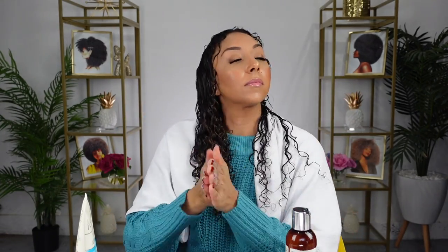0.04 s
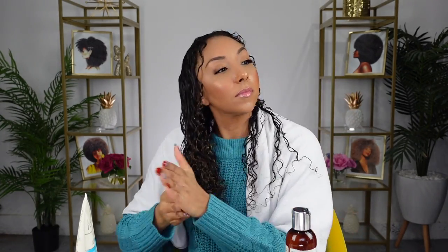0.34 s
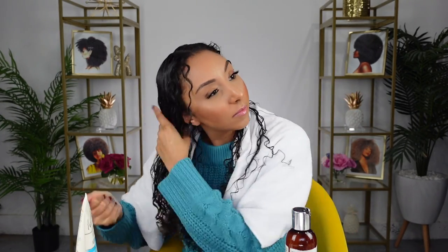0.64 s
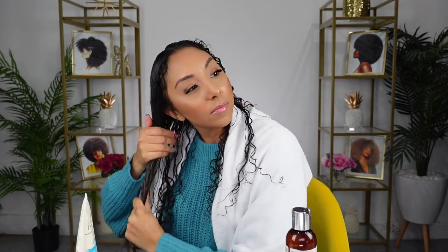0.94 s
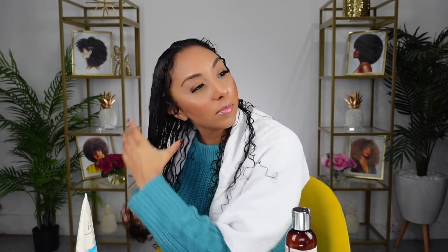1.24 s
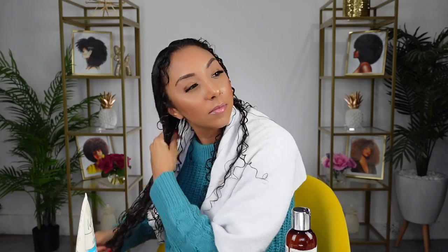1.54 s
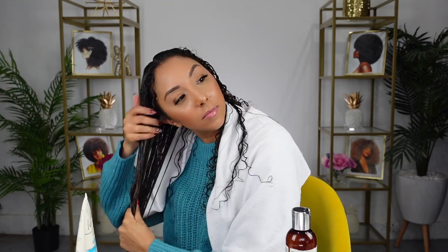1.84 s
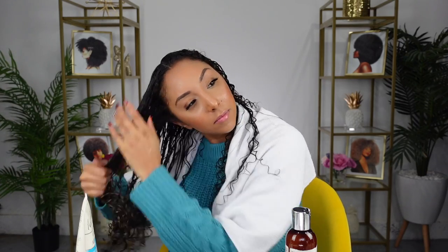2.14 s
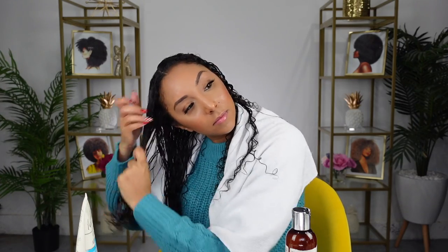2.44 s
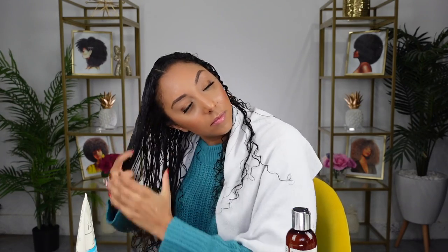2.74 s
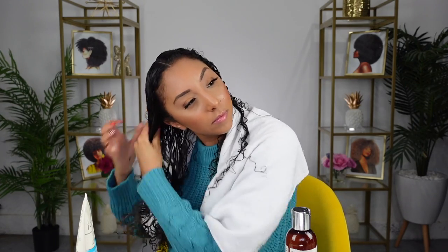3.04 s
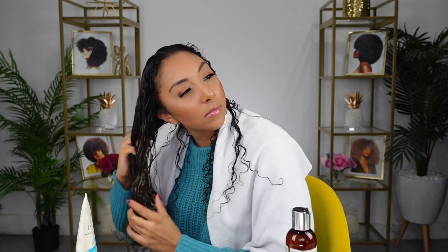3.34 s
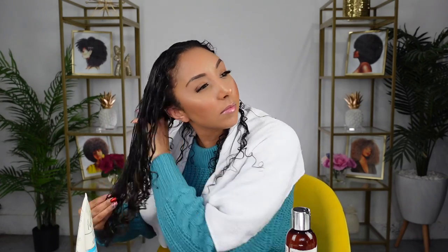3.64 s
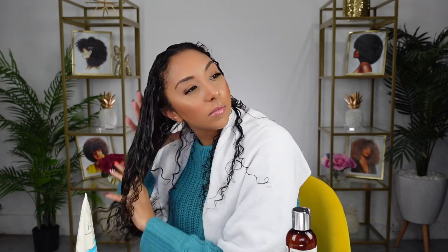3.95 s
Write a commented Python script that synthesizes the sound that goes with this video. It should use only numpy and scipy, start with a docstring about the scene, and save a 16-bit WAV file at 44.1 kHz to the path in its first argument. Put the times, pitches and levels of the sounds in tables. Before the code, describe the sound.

Hands smooth product into wet hair, starting with a squelch, small pops and a wet smack of the palms. Repeated soft swishes along the strands follow, with light clothing rustle and a faint hum in a small quiet room.

```python
"""In a small quiet room, two palms squelch hair product between them and part with a wet smack.
Air pockets burst in the product with tiny pops, and its film fizzes as the palms peel apart.
The hands then slide down wet hair, stroke after stroke: strands hiss, with small sticky ticks,
and damp skin drags with a hollow note. Under it lie rustling cloth, room noise, a short deep
rumble and a faint low hum, as of a distant motor."""
import sys
import numpy as np
from scipy import signal
from scipy.fft import rfft, irfft
from scipy.io import wavfile

SR = 44100
rng = np.random.default_rng(int(sys.argv[2]) if len(sys.argv) > 2 else 0)


def dump_mix(stems):
    """Bounce the given channels to the path in sys.argv[1] as a 16-bit WAV at rate SR."""
    frames = np.atleast_2d(stems).T  # one column per channel
    limited = np.clip(frames, -1, 1)  # hard clip at full scale
    pcm = np.round(limited * 32767).astype(np.int16)
    wavfile.write(sys.argv[1], SR, pcm)


N = 176400
TIME = np.arange(N) / SR
FREQUENCIES = np.arange(N // 2 + 1) * SR / N
CUTOFF_HZ = 15750

# the tone of tiny wet bubbles: (frequency [Hz], level [dB])
FIZZ_SPECTRUM = [(2000, -36), (6500, -20), (8600, -1.5), (10500, -4), (13500, 3), (16000, -14.5)]


def from_db(db):
    """Turn decibels into a factor to multiply by."""
    return 10 ** (np.asarray(db) / 20)


def rms_one(x):
    """Scale a signal so that its average power is 1."""
    return x / np.sqrt(np.mean(x ** 2) + 1e-20)


def fade(t, ring_s):
    """Die away by 60 dB in the ring time."""
    return from_db(-60 * t / ring_s)


def level_curve(rows):
    """Join (time [s], level [dB]) points into a volume curve."""
    return from_db(np.interp(TIME, *np.transpose(rows)))


def at_hz(points, hz):
    """Read between a table's frequencies, giving each octave equal space."""
    known_hz, values = np.transpose(points)
    return np.interp(np.log(np.maximum(hz, 1)), np.log(known_hz), values)


def coloured(x, spectrum):
    """Give a noise the tone in a table, at an average power of 1."""
    return rms_one(irfft(rfft(x) * from_db(at_hz(spectrum, FREQUENCIES)), N))


def filtered(x, kind, hz):
    """Gently keep the lows, the highs or one band."""
    return signal.sosfilt(signal.butter(2, hz, kind, fs=SR, output="sos"), x)


def drift(rate_hz):
    """A slow random wander, about 1 in size."""
    return rms_one(irfft(rfft(rng.standard_normal(N)) / (1 + (FREQUENCIES / rate_hz) ** 2), N))


def grains(spectrum, per_s, spread_db):
    """Many tiny random clicks of uneven size that blur into a hiss."""
    sizes = from_db(spread_db * np.minimum(rng.exponential(1, N), 5))
    happens = rng.random(N) < per_s / SR
    return coloured(happens * sizes * rng.standard_normal(N), spectrum)


def swell(start, end, rise_s, fall_s):
    """A smooth rise centred on start and a smooth fall centred on end."""
    rise = np.clip(.5 + (TIME - start) / rise_s, 0, 1)
    fall = np.clip(.5 + (end - TIME) / fall_s, 0, 1)
    return np.sin(np.pi / 2 * rise * fall)


def squelch():
    """Product squelches as the palms squeeze it."""
    # how loud the squeeze is: (time [s], level [dB])
    squeeze = [(0, -21), (.012, -29), (.04, -30.5), (.065, -42), (.11, -40), (.16, -54), (.2, -61),
               (.24, -76), (.29, -76)]
    # its tone: (frequency [Hz], level [dB])
    spectrum = [(150, -48), (400, -4.5), (700, -14.5), (1150, -16.5), (1800, -5), (3000, 0), (4200, -5),
                (6100, -1.5), (8000, -14.5), (11000, -21.5), (16000, -30)]
    return level_curve(squeeze) * grains(spectrum, per_s=14000, spread_db=0)


def cloth():
    """Sleeves and a towel rustle while the arms move."""
    # how loud the rustle is: (time [s], level [dB])
    rustle = [(0, -56), (.65, -60.5), (.85, -54.5), (1.5, -55), (2.2, -53), (2.8, -52), (3.3, -53.5),
              (3.7, -54.5), (4, -52.5)]
    # its tone: (frequency [Hz], level [dB])
    spectrum = [(30, -5), (90, -1.5), (200, -5), (400, -11), (800, -11.5), (1300, -15), (2500, -24.5),
                (8000, -20.5), (16000, -25.5)]
    return level_curve(rustle) * coloured(rng.standard_normal(N), spectrum)


def background():
    """Steady room noise, a wavering motor-like hum and a deep rumble that comes and goes."""
    # the tone of the room noise: (frequency [Hz], level [dB])
    noise_spectrum = [(15, -7), (35, 1), (55, 0.5), (100, -8), (200, -15), (500, -18.5), (1000, -22.5),
                      (2000, -23), (5000, -32), (13000, -34), (16000, -42.5)]
    # the hum's steadier tones: (multiple of its pitch, level [dB])
    steady_tones = [(1, -68), (4, -73), (5, -74)]
    # its two strongest tones swell: (time [s], level at 2 x pitch [dB], level at 3 x pitch [dB])
    hum_swells = [(0.199, -59.5, -62.5), (.8, -68.5, -70), (1.5, -57, -70), (1.75, -57.5, -62.5),
                  (2.0, -60, -53.5), (2.402, -59, -77), (2.9, -63.5, -68), (3.27, -63.5, -56.5),
                  (3.7, -69, -61), (4, -64, -72)]
    hum_hz, rumble_hz, waver_db = 83, 35, 4
    phase_per_hz = 2 * np.pi * np.cumsum(1 + .004 * drift(2)) / SR  # the pitch wanders slightly
    times, second_db, third_db = np.transpose(hum_swells)
    swelling_tones = [(2, np.interp(TIME, times, second_db)), (3, np.interp(TIME, times, third_db))]
    hum = sum(from_db(db + waver_db * drift(.52)) * np.sin(multiple * hum_hz * phase_per_hz)
              for multiple, db in list(steady_tones) + swelling_tones)
    rumble = from_db(-52) * swell(.48, 1.57, .14, .14) * np.sin(rumble_hz * phase_per_hz)
    noise = from_db(-54) * coloured(rng.standard_normal(N), noise_spectrum)
    return np.sqrt(2) * (hum + rumble) + noise


def burst(start, db, tones):
    """Air breaks through wet product: a short crack and a few briefly ringing tones."""
    t, out = TIME[:SR // 20], np.zeros(N + SR)
    crack = from_db(-8.5) * fade(t, ring_s=.0077) * rng.standard_normal(len(t))
    sound = filtered(crack, "low", hz=9600)
    for hz, tone_db, ring_s in tones:
        if hz < CUTOFF_HZ:
            sound += from_db(tone_db) * fade(t, ring_s) * np.sin(2 * np.pi * hz * t)
    quick_rise = 1 - np.exp(-t / .00032)
    first = int(start * SR)
    out[first:first + len(t)] = from_db(db) * sound * quick_rise
    return out[:N]


def pops():
    """Small air pockets burst in the product, each with its own pitch."""
    # the pockets: (time [s], level [dB], pitch [Hz], ring time [s])
    pockets = [(0.0688, -7.5, 7670, 0.0027), (0.0711, -28, 1653, 0.033), (0.0926, -6, 2220, 0.0034),
               (0.16, -33, 1670, 0.018), (.1826, -25.5, 1870, 0.0055), (0.255, -34, 5800, 0.0036),
               (0.3977, -29.5, 9700, 0.003), (.5887, -48, 9000, .006), (1.332, -36, 11600, .004),
               (1.6423, -30, 7700, 0.0032), (2.0925, -27, 9000, .003), (2.211, -29, 8150, .003),
               (2.649, -24, 8800, 0.0027), (2.931, -34, 4830, 0.0026)]
    # the tones of every pocket: (multiple of its pitch, level [dB], multiple of its ring time)
    pocket_tones = [(.55, -24, 1.73), (1.0, 3.5, 1.0), (1.48, -3.5, 0.89)]
    out = np.zeros(N)
    for start, db, hz, ring_s in pockets:
        tones = [(hz * ratio, tone_db, ring_s * stretch) for ratio, tone_db, stretch in pocket_tones]
        out += burst(start, db, tones)
    return out


def fizz():
    """Tiny wet bubbles crackle in the product."""
    return grains(FIZZ_SPECTRUM, per_s=7600, spread_db=2.5)


def peeling_film():
    """The film of product fizzes as the palms peel apart."""
    # moments of peeling: (start [s], end [s], level [dB])
    peels = [(0.15, 0.22, -61), (0.29, 0.354, -53.5), (0.39, 0.424, -52), (0.587, .62, -62)]
    return fizz() * sum(from_db(db) * swell(start, end, .012, .012) for start, end, db in peels)


def smack():
    """The palms come unstuck and the hollow between them rings."""
    # the hollow's tones: (frequency [Hz], level [dB], ring time [s])
    hollow_tones = [(380, -37, 0.02), (973, -17.5, 0.023), (1206, -15, 0.019), (1770, -14.5, 0.024),
                    (2480, -22, 0.0082), (2890, -5.5, 0.0079), (3210, -2.5, 0.0089), (3473, -5.5, 0.0091),
                    (4520, -17.5, 0.019), (7020, -10, 0.0052), (8610, -15, 0.0077), (10250, -22, 0.019),
                    (13500, -21, .006)]
    return filtered(burst(start=.2991, db=-1.5, tones=hollow_tones), "high", hz=586)


def hair():
    """Strands slip under the hand; grip and wetness differ from stroke to stroke."""
    # the strokes: (start [s], end [s], rise [s], fall [s], hiss [dB], grip [dB], fizz [dB])
    strokes = [(0.82, .99, 0.17, 0.23, -49.5, -56.5, -58), (1.04, 1.26, 0.14, 0.13, -53.5, -61, -59),
               (1.307, 1.511, .11, 0.034, -55, -63.5, -57.5), (1.663, 1.835, 0.21, 0.17, -47, -60, -75),
               (1.927, 2.05, 0.099, .07, -53.5, -74, -54), (2.01, 2.22, 0.044, 0.14, -47, -63, -50.5),
               (2.404, 2.625, .11, .08, -48.5, -58, -57), (2.615, 2.705, 0.064, 0.097, -45, -43.5, -51),
               (2.697, 2.808, 0.077, 0.092, -46, -42.5, -47.5), (3.01, 3.133, .035, .09, -61, -70, -57.5),
               (3.117, 3.31, 0.17, 0.18, -48, -55.5, -61), (3.365, 3.563, 0.31, 0.087, -52, -59.5, -54.5),
               (3.56, 3.685, .07, 0.056, -54.5, -61, -63), (3.856, 4.05, .09, .08, -52.5, -62.5, -52)]
    # the tone of strands on skin: (frequency [Hz], level [dB])
    hiss_spectrum = [(300, -18), (1000, -11.5), (2200, -8), (4000, -8.5), (5800, 0), (7000, -2.5),
                     (8700, 2.5), (10000, -6), (13500, -5), (16000, -12)]
    # the tone of a firmer hold: (frequency [Hz], level [dB])
    grip_spectrum = [(300, -30), (1200, -21), (2350, -8.5), (2800, -1), (3500, -3), (4300, 2), (6000, -7),
                     (9000, -7.5), (16000, -18)]
    power = np.zeros((3, N))  # one row each for hiss, grip and fizz
    for start, end, rise_s, fall_s, *levels_db in strokes:
        progress = np.clip((TIME - start) / (end - start), 0, 1)
        arch_db = np.sin(np.pi * progress) - 1  # a little louder in mid-stroke
        shape = swell(start, end, rise_s, fall_s) * from_db(arch_db)
        power += (from_db(levels_db)[:, None] * shape) ** 2
    hiss = grains(hiss_spectrum, per_s=32000, spread_db=2.1)
    grip = grains(grip_spectrum, per_s=32000, spread_db=2.1)
    sliding = np.sum(np.sqrt(power) * [hiss, grip, fizz()], axis=0)
    unevenness = from_db(1.48 * drift(rate_hz=13))
    return swishing(sliding) * unevenness


def swishing(x):
    """The tone shifts as the hand moves along the strands: twelve bands each swell and fade."""
    log_centres = np.log(np.geomspace(900, 15000, 12))
    log_hz, spectrum = np.log(1 + FREQUENCIES), rfft(x)
    out = np.zeros(N)
    for weights in np.eye(len(log_centres)):
        band = irfft(spectrum * np.interp(log_hz, log_centres, weights), N)
        out += band * from_db(1.1 * drift(rate_hz=7.4))
    return out


def skin_drags():
    """Damp skin drags, and the cupped hand turns the rubbing into a faint hollow note."""
    # the drags: (start [s], end [s], pitch [Hz], level [dB])
    drags = [(1.01, 1.21, 1070, -59.5), (1.06, 1.185, 1460, -58.5), (1.374, 1.52, 1660, -64),
             (1.61, 1.69, 1020, -57)]
    width_hz, edge_s = 180, .11
    out = np.zeros(N)
    for start, end, hz, db in drags:
        cupped_hand = signal.iirpeak(hz, hz / width_hz, fs=SR)
        note = rms_one(signal.lfilter(*cupped_hand, rng.standard_normal(N)))
        out += from_db(db) * swell(start, end, edge_s, edge_s) * note
    return out


def near_echoes(x):
    """Nearby surfaces throw back slightly duller copies of a sound."""
    # one echo per surface: (delay [s], level [dB])
    echoes = [(.0009, -8.5), (.0037, -10), (0.0094, -34), (.0172, -35), (0.0274, -17), (0.027, -34),
              (0.0326, -34)]
    copies = sum(from_db(db) * np.pad(x, (int(delay * SR), 0))[:N] for delay, db in echoes)
    return filtered(copies, "low", hz=9700)


def room(x):
    """Sound scatters quickly off the furniture, then lingers and dies away band by band."""
    # how long the room rings: (frequency [Hz], ring time [s])
    ring_times = [(200, .35), (1000, 0.47), (3300, 0.4), (6000, 0.44), (14000, .22)]
    # how strongly it rings: (frequency [Hz], level [dB])
    ring_levels = [(200, -9), (1000, -7), (3300, -6.5), (6000, -10), (14000, -17)]
    t = TIME[:SR * 3 // 4]
    edges_hz = np.geomspace(150, 17000, 11)
    noise = rng.standard_normal((3, len(t)))
    scatter = noise[2] * fade(t, ring_s=.063)
    response = from_db(-4.5) * scatter / np.linalg.norm(scatter)
    for k, (low, high) in enumerate(zip(edges_hz, edges_hz[1:])):
        hz = np.sqrt(low * high)
        tail = fade(t, at_hz(ring_times, hz))
        band = filtered(noise[k % 2], "band", [low, high])
        response += from_db(at_hz(ring_levels, hz)) * band * tail / np.linalg.norm(tail)
    build_up = np.clip(t / .0068, 0, 1)
    return signal.fftconvolve(x, response * build_up)[:N]


def scene():
    """Mix the hands, the hair and the room into one channel."""
    bursts = pops() + smack()
    hands = squelch() + bursts + near_echoes(bursts) + peeling_film()
    strokes = hair() + skin_drags()
    room_ring = room(hands + from_db(-2.5) * strokes)
    return (hands + strokes + room_ring + cloth() + background())[None]


def record(dry):
    """Cut off the very highest treble steeply."""
    return signal.sosfilt(signal.ellip(12, .1, 80, CUTOFF_HZ, fs=SR, output="sos"), dry)


dry = scene()
out = record(dry)
dump_mix(out)
```